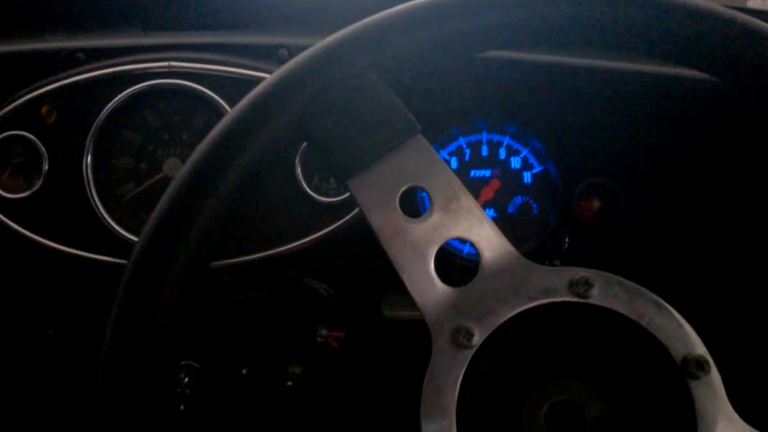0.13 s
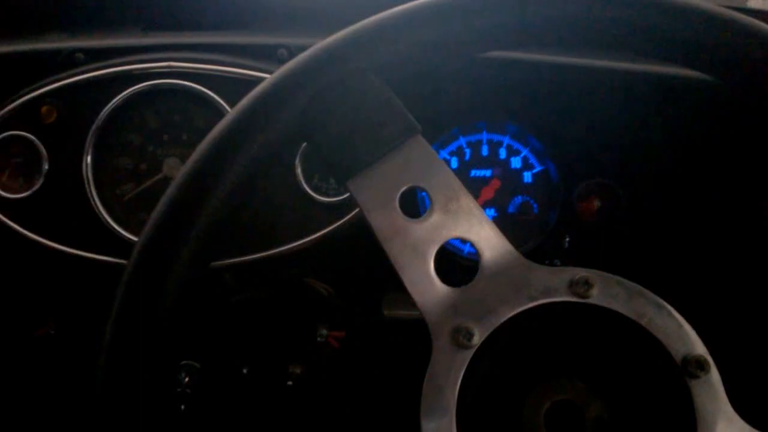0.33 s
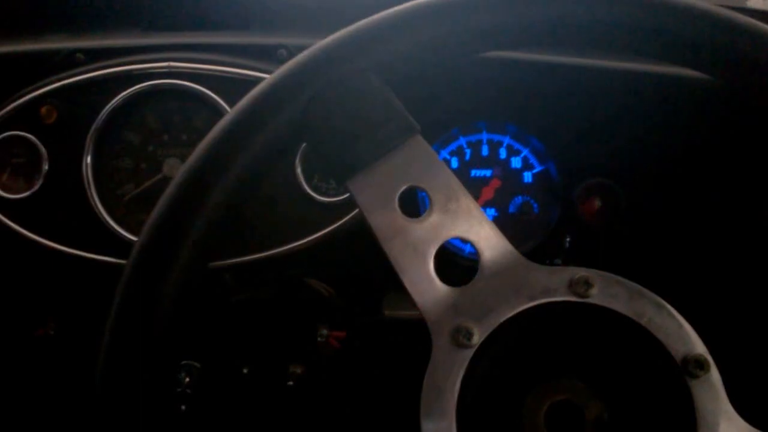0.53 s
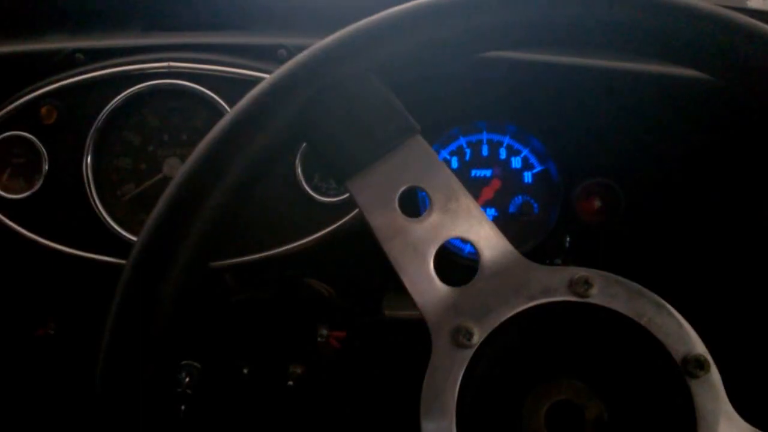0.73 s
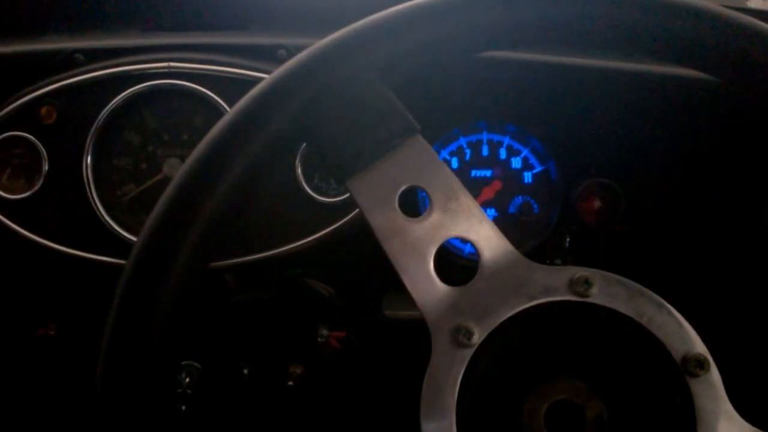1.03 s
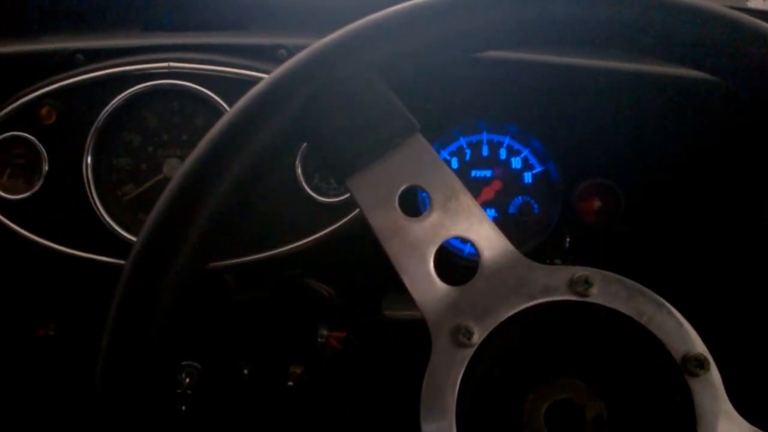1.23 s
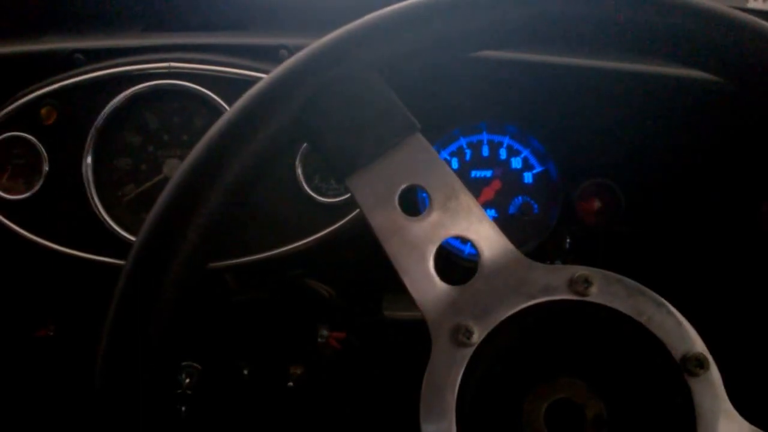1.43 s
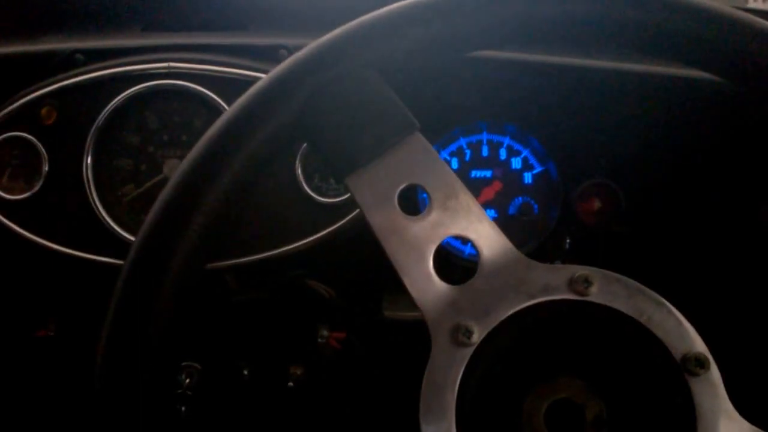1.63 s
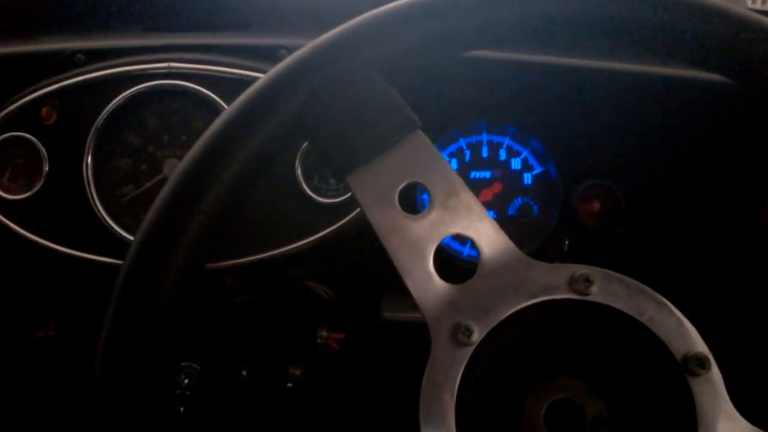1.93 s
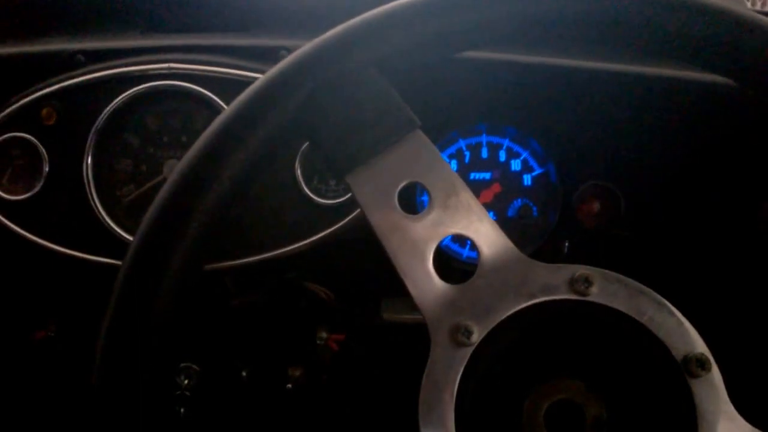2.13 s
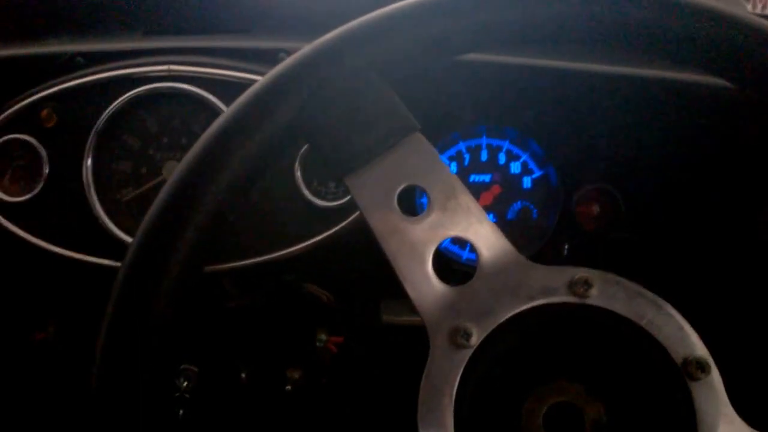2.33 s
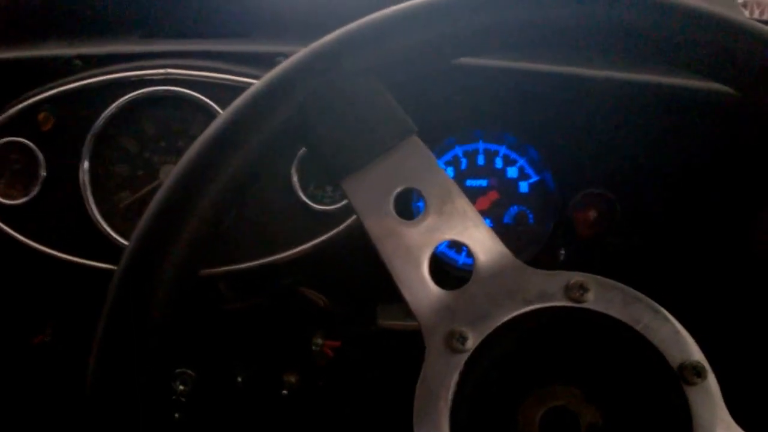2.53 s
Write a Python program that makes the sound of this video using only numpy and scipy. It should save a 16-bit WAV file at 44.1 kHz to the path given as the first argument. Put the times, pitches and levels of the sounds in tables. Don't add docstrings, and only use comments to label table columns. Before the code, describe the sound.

A rough four-cylinder engine rises and falls with short throttle blips, booming inside the car

```python
import sys
import numpy as np
from scipy import signal
from scipy.fft import rfft, irfft, next_fast_len
from scipy.io import wavfile
from scipy.ndimage import uniform_filter1d, minimum_filter1d, map_coordinates

SR = 44100
rng = np.random.default_rng(int(sys.argv[2]) if len(sys.argv) > 2 else 0)


def gain_from_db(level_db):
    decades = np.asarray(level_db, float) / 20
    return 10 ** decades


def output_pcm(signal):
    pcm = np.clip(np.atleast_2d(signal).T, -1, 1) * 32767
    wavfile.write(sys.argv[1], SR, np.round(pcm).astype(np.int16))


N = 117747


def unit(x):
    return x / np.sqrt(np.mean(x ** 2) + 1e-20)


def curves(rows):
    time_s, *columns = np.transpose(rows)
    return [np.interp(np.arange(N) / SR, time_s, column) for column in columns]


def wobble(rate_hz):
    knots = rng.standard_normal(400)
    return map_coordinates(knots, [np.arange(N) * rate_hz / SR], mode="mirror")


def filtered(x, response):
    m = next_fast_len(N + SR // 2)
    return irfft(rfft(x, m) * response(np.fft.rfftfreq(m, 1 / SR)), m)[:N]


def ringing(modes):
    def response(f):
        total = 0
        for k, (centre, width, db) in enumerate(modes):
            damping = 1j * f * width
            total = total + (-1) ** k * gain_from_db(db) * damping / (centre * centre - f * f + damping)
        return total
    return response


def colour(points):
    hz, db = np.transpose(points)

    def response(f):
        gain = gain_from_db(np.interp(np.log(f + 1), np.log(hz + 1), db))
        return gain / (1 + (hz[0] / (f + 1)) ** 4)
    return response


def patchy(patchy_db):
    z = signal.stft(rng.standard_normal(N + 512), nperseg=512)[2]
    field = uniform_filter1d(rng.standard_normal(z.shape), size=5, axis=0)
    field = uniform_filter1d(field, size=6, axis=1)
    return signal.istft(z * gain_from_db(patchy_db * unit(field)), nperseg=512)[1][:N]


# freq_hz [Hz], density_db [dB per Hz]
BELT_SPECTRUM = [(3000, 0.5), (5000, -4), (8500, -2), (12000, -14), (15500, -9)]
HISS_DB, HISS_PER_OCTAVE_DB = -64.5, 9


def belt_hiss(firing_hz):
    octaves = np.log2(firing_hz / firing_hz.mean())
    hiss = unit(filtered(patchy(2.0), colour(BELT_SPECTRUM)))
    return gain_from_db(HISS_DB + HISS_PER_OCTAVE_DB * octaves) * hiss


def rattle(spells, modes):
    t = np.arange(N) / SR
    shaken = 0
    for start_s, length_s, db in spells:
        progress = np.clip((t - start_s) / length_s, 0, 1)
        shaken = shaken + gain_from_db(db) * np.sqrt(np.abs(np.sin(np.pi * progress)))
    chatter = rng.standard_normal(N) * gain_from_db(3 * wobble(140))
    return filtered(shaken * chatter, ringing(modes)) / np.std(filtered(chatter, ringing(modes)))


# start_s [s], length_s [s], level_db [dB]
SQUEAK_SPELLS = [
    (.45, .1, -53),
    (1.36, .08, -55),
    (2.18, .075, -50),
]
# freq_hz [Hz], width_hz [Hz], level_db [dB]
MOUNT_MODES = [(2444, 36, 0)]


def mount_squeak():
    return rattle(SQUEAK_SPELLS, MOUNT_MODES)


# start_s [s], length_s [s], level_db [dB]
BRACKET_SPELLS = [(.055, .05, -45), (.19, .1, -50), (.77, .05, -45), (1.095, .055, -43.5),
                  (1.575, .05, -42), (2.055, .045, -46)]
# freq_hz [Hz], width_hz [Hz], level_db [dB]
BRACKET_MODES = [(2385, 55, 0), (4097, 55, -7)]


def bracket_ring():
    return rattle(BRACKET_SPELLS, BRACKET_MODES)


# start_s [s], length_s [s], level_db [dB]
TRIM_SPELLS = [(.055, .04, -53), (.24, .06, -60), (.76, .05, -54), (1.12, .07, -56), (1.54, .06, -53),
               (2.035, .05, -56), (2.355, .06, -53), (2.58, .06, -55)]
# freq_hz [Hz], width_hz [Hz], level_db [dB]
TRIM_MODES = [(4435, 44, 2.5), (6148, 40, -7), (6939, 26, -4.5)]


def trim_buzz():
    return rattle(TRIM_SPELLS, TRIM_MODES)


# time_s [s], intake roar level_db [dB]
THROTTLE_CURVE = [(.06, -30.5), (.4, -40.5), (.62, -32.5), (.8, -25.5), (1, -35), (1.17, -33.5),
                  (1.24, -41.5), (1.5, -33.5), (1.6, -20.5), (1.7, -21.5), (1.82, -36.5), (2.06, -37),
                  (2.22, -44), (2.27, -29.5), (2.42, -19), (2.555, -35.5), (2.59, -18), (2.67, -12)]
# freq_hz [Hz], width_hz [Hz], level_db [dB over the roar's colour]
DUCT_MODES = [(410, 82, 4.5), (522, 13, 12.5), (815, 80, 15.5), (1140, 57, -4.5), (1352, 30, -16),
              (1970, 190, 6.5), (2280, 88, 15), (4470, 250, 8), (8500, 950, 1)]
# freq_hz [Hz], density_db [dB per Hz]
ROAR_SPECTRUM = [(250, 10.5), (800, -10.5), (1500, 0), (2100, -23.5), (3200, -42), (5500, -37.5),
                 (8500, -43.5), (15500, -52.5)]
# freq_hz [Hz], density_db [dB per Hz]
WHIRR_SPECTRUM = [(280, -2.5), (600, -5), (1000, -5.5), (1600, -14), (2700, -19.5), (4200, -32.5),
                  (6000, -42), (15500, -47.5)]
GULP_SHARE = 0.33
PATCH_DB = 1.1
ROAR_DB, ROAR_FLUTTER_DB = 1.5, 1.2
WHIRR_DB, WHIRR_FLUTTER_DB, WHIRR_GROWS = -33, 1, 0.45


def intake(turns, roar_db):
    gulp = 1 - GULP_SHARE + GULP_SHARE * 2 * np.exp(-2.5 * (turns % 1))

    def duct(f):
        return colour(ROAR_SPECTRUM)(f) * (0.46 + np.abs(ringing(DUCT_MODES)(f)))

    open_db = roar_db - 8.5 / (1 + gain_from_db(5.4 * (roar_db + 36)))
    flutter_db = ROAR_FLUTTER_DB * (wobble(23.985) + wobble(55))
    roar = unit(filtered(gulp * patchy(PATCH_DB), duct)) * gain_from_db(open_db + ROAR_DB + flutter_db)

    swell_db = WHIRR_GROWS * (roar_db - roar_db.mean()) + WHIRR_FLUTTER_DB * wobble(17)
    whirr = unit(filtered(gulp * patchy(PATCH_DB), colour(WHIRR_SPECTRUM)))
    return roar + whirr * gain_from_db(WHIRR_DB + swell_db)


# freq_hz [Hz], width_hz [Hz], level_db [dB]
CABIN_MODES = [(28.7, 9.5, 0), (64.8, 13.4, 0), (118.5, 16.3, -2), (142.6, 13.8, 1), (185.7, 13.2, -1),
               (239.5, 7.1, 0.5), (310, 15, -9), (389, 38, -17), (442, 7.3, -8), (499, 9.1, -6.5)]
PULSE_HZ = 240


def cabin(f):
    return ringing(CABIN_MODES)(f) / (1 + 1j * f / PULSE_HZ) ** 2


DRUM_DB, DRUM_GROWS = -19.5, 0.55


def panels(roar_db):
    shake_db = DRUM_GROWS * (roar_db - roar_db.mean()) + 2.5 * wobble(8.5)
    shake = gain_from_db(shake_db) * rng.standard_normal(N)
    return gain_from_db(DRUM_DB) * unit(filtered(shake, cabin))


CYLINDER_SIZES = [0.96, 0.77, 1.19, 0.38]
EXHAUST_DB = -25
SCATTER_DB, JITTER = 6, 0.037


def exhaust(turns, firing_db):
    at = np.flatnonzero(np.diff(np.floor(turns)))
    luck = rng.standard_normal((len(at), 2))
    late = JITTER * luck[:, 0] * np.gradient(at)
    size = np.resize(CYLINDER_SIZES, len(at)) * gain_from_db(SCATTER_DB * luck[:, 1])
    sample = np.clip(np.round(at + late), 0, N - 1).astype(int)
    blows = np.bincount(sample, size, N)
    return gain_from_db(EXHAUST_DB) * unit(filtered(blows * gain_from_db(firing_db), cabin))


# multiple of the firing rate [ratio], level_db [dB]
ORDER_LEVELS = [(1.5, -4), (2, -6.5), (2.5, -9.5), (3, -8), (3.5, -9.5), (4, -14), (4.5, -10), (5, -12.5),
                (5.5, -14.5), (6, -11), (7, -15.5)]
TONE_DB, TONE_WAVER_DB = -9.5, 3
HALF_DB, NOTE_WAVER_DB = -5.5, 1.4


def orders(turns, firing_hz, note_db, others_db):
    def line(multiple, boom_multiple):
        boom = np.abs(ringing(CABIN_MODES)(boom_multiple * firing_hz))
        return boom * np.sin(2 * np.pi * (multiple * turns + rng.random()))

    others = 0
    for multiple, db in ORDER_LEVELS:
        others = others + gain_from_db(db + TONE_WAVER_DB * wobble(14)) * line(multiple, multiple)
    note = line(1, 1) + gain_from_db(HALF_DB) * line(0.5, 0.71)
    note = note * gain_from_db(note_db + NOTE_WAVER_DB * wobble(21.66))
    return gain_from_db(TONE_DB) * (note + gain_from_db(others_db) * others)


# time_s [s], firing_hz [Hz], firing note_db [dB], other orders others_db [dB]
ENGINE_CURVE = [(.06, 78.7, 3, 4.5), (.23, 69.6, -7.5, -7), (.3, 66.14, 4, -3.5), (.53, 49.36, 2.5, -3.5),
                (.77, 70.25, -1, 1), (.88, 86.12, -3, -1.5), (1.17, 66.84, 0.5, -6.5),
                (1.37, 55.87, 0.5, -1), (1.58, 72.06, 2.5, 3), (1.65, 88.16, -16, 4.5),
                (1.75, 97.6, -13, 3), (1.95, 79.8, 0.5, -15), (2.04, 72.16, -6.5, -14.5),
                (2.1, 65.03, 4, -8.5), (2.26, 53.3, 5, -2), (2.37, 71.1, -2, 2), (2.5, 90.9, -15, -1),
                (2.67, 111.7, 4, 0)]


def scene():
    firing_hz, note_db, others_db = curves(ENGINE_CURVE)
    roar_db, = curves(THROTTLE_CURVE)
    turns = np.cumsum(firing_hz) / SR
    background = belt_hiss(firing_hz) + mount_squeak() + bracket_ring() + trim_buzz()
    engine = panels(roar_db) + exhaust(turns, others_db)
    engine = engine + orders(turns, firing_hz, note_db, others_db)
    return (background + intake(turns, roar_db) + engine)[None]


def low_pass(x):
    return signal.sosfilt(signal.butter(12, 15720, fs=SR, output="sos"), x)


SQUEEZE, SQUEEZE_S, USUAL_DB = 0.35, 0.08, -13
LIMIT, HOLD_S, GLIDE_S = 0.69, 0.012, 0.008
START_S, TOP_HZ = 0.0575, 15700
SWITCH_ON, SETTLE_S = -0.22, 0.006


def record(dry):
    power = np.abs(uniform_filter1d(dry ** 2, int(SQUEEZE_S * SR), axis=1)) + 1e-4
    dry = dry * gain_from_db(-SQUEEZE * (10 * np.log10(power) - USUAL_DB))

    need = np.minimum(1, LIMIT / (np.abs(dry) + 1e-9))
    held = minimum_filter1d(need, int(HOLD_S * SR), axis=1)
    gain = uniform_filter1d(held, int(GLIDE_S * SR), axis=1)

    band = filtered((dry * gain)[0], lambda f: (f < TOP_HZ) / (1 + (18 / (f + 1e-3)) ** 4))
    since = np.arange(N) / SR - START_S
    settling = np.exp(-np.abs(since) / SETTLE_S)
    band = band * (1 - settling) + SWITCH_ON * settling
    return low_pass((band * (since >= 0))[None])


dry = scene()
out = record(dry)
output_pcm(out)
```